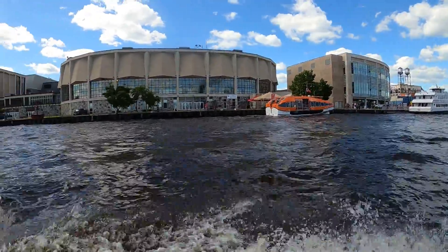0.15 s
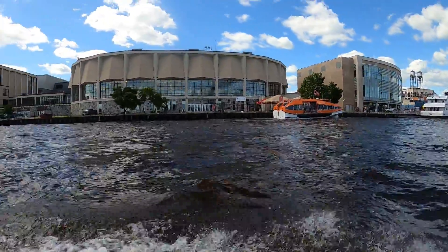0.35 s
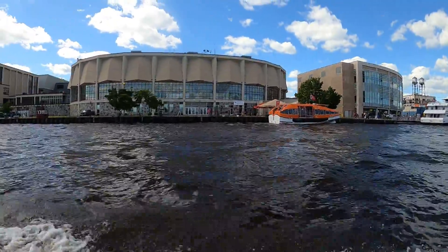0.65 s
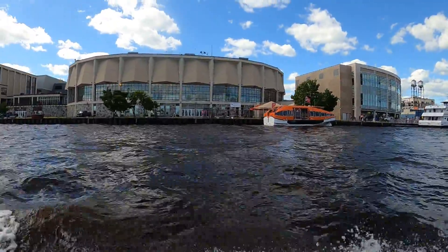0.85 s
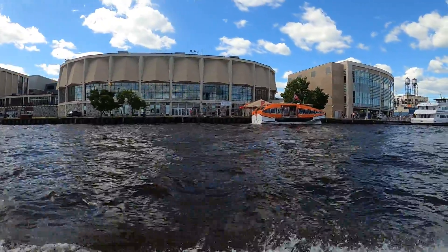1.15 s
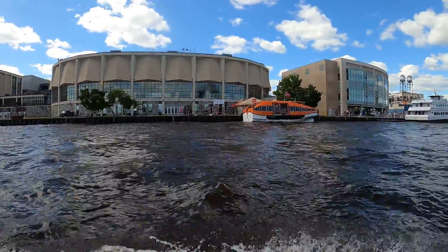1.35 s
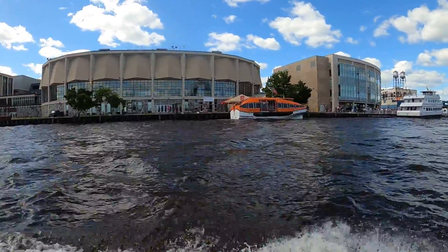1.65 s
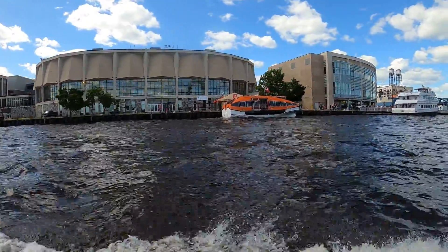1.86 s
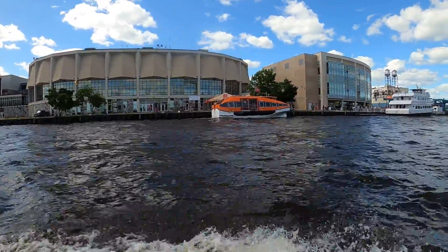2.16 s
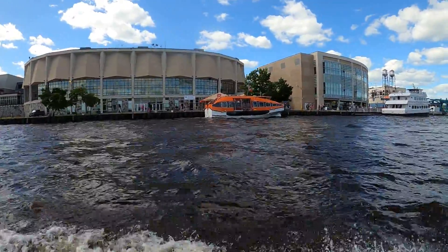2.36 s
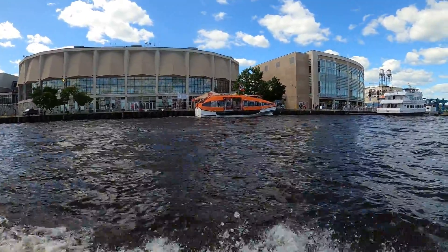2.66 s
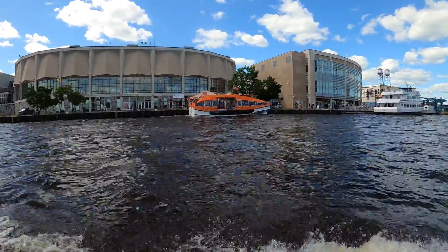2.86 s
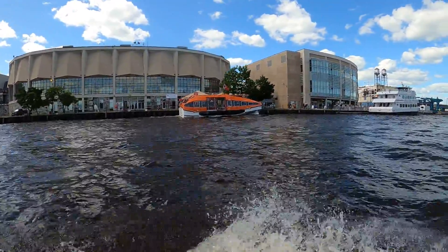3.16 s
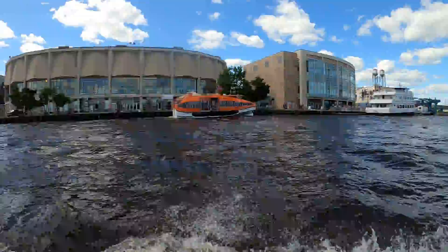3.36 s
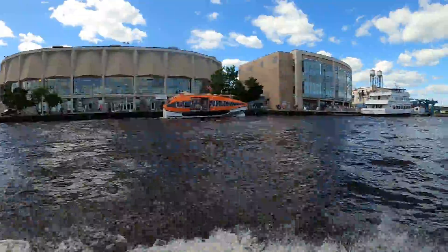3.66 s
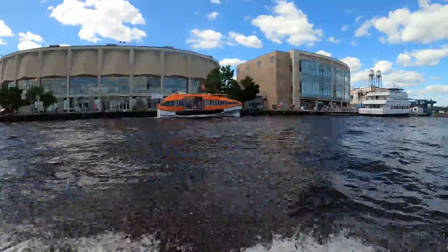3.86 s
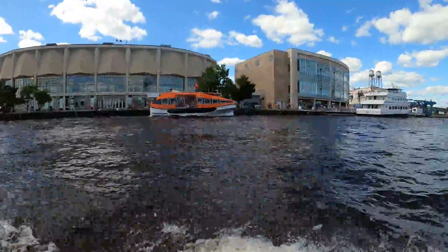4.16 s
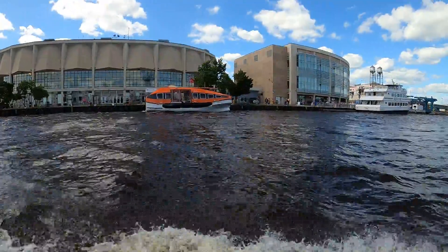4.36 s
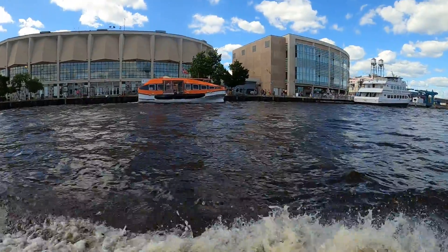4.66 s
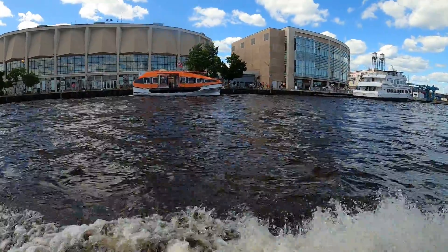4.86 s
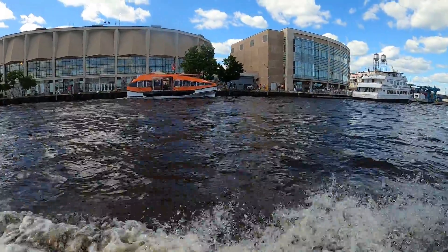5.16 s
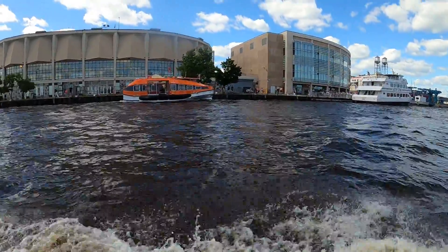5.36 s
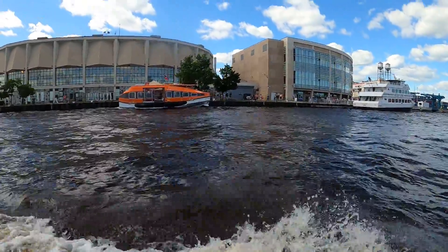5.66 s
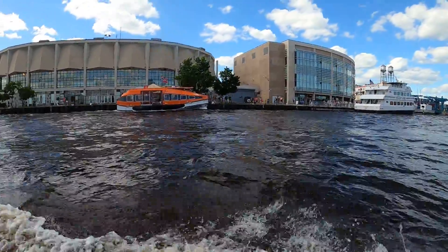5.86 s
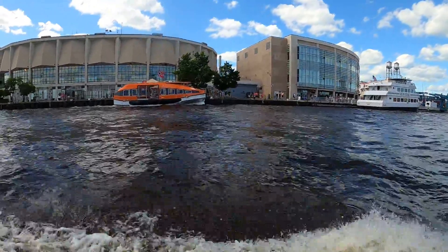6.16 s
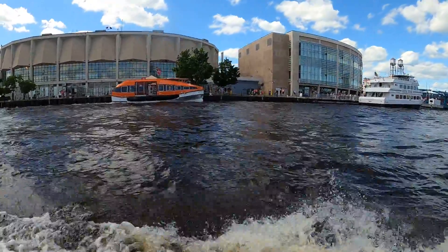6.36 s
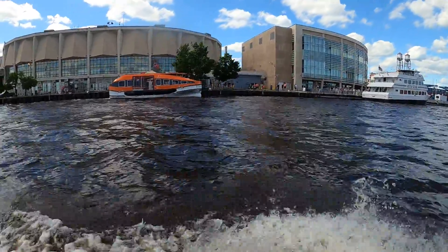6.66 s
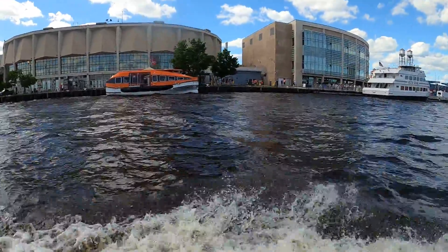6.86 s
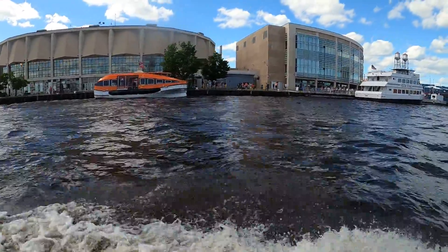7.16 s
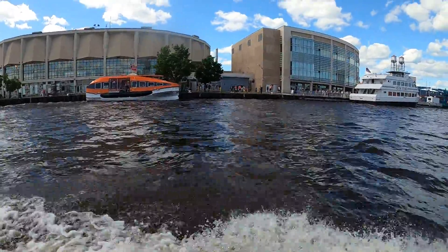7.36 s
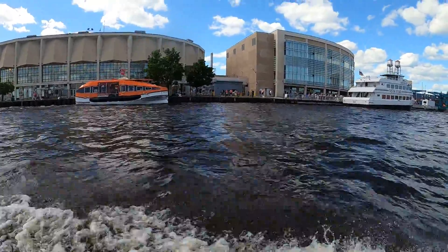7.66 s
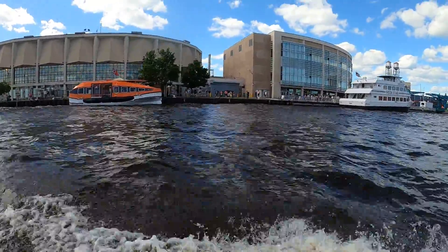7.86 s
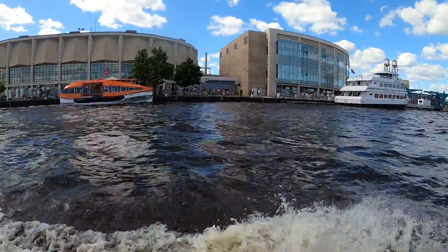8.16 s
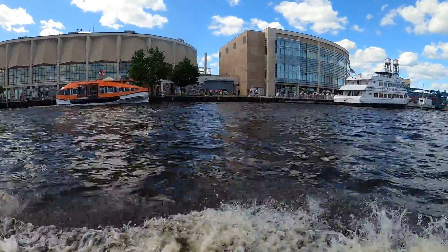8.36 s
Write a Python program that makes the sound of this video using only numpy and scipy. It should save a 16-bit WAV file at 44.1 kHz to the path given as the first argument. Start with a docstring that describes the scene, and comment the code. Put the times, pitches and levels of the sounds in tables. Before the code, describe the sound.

On board a cruising motorboat: constant deep exhaust hum, bubbling white water with surging hissing sheets of spray, rumbling wind, a single wave slap.

```python
"""A small boat cruises across a harbour, heard from on board.
From the start the exhaust drones at the firing rate, with weaker lines from shaft and unequal firings.
The wake, made of filtered noise, drops and ringing bubbles, churns and throws up sheets of spray.
Wind, a low filtered noise, buffets the microphone all along.
After about a second and a half one wave slaps the hull: a short ringing knock that falls in pitch."""
import sys
import numpy as np
from scipy import signal
from scipy.fft import rfft, irfft, next_fast_len
from scipy.io import wavfile

SR = 44100
rng = np.random.default_rng(int(sys.argv[2]) if len(sys.argv) > 2 else 0)


def master_out(mix):
    """Clip the mix to full scale and print it as 16-bit PCM to the path in sys.argv[1]."""
    frames = np.transpose(np.atleast_2d(mix))
    ceiling = np.clip(frames, -1, 1)
    pcm = np.round(ceiling * 32767).astype(np.int16)
    wavfile.write(sys.argv[1], SR, pcm)


N = 375291  # length in samples, about 8.5 s


def undb(db):
    """Turn decibels into gain."""
    return 10 ** (np.asarray(db) / 20)


def unit(x):
    """Scale to rms 1."""
    return x / np.sqrt(np.mean(x ** 2))


def curves(table):
    """Join the points of each column by straight lines in time."""
    times, *columns = np.transpose(table)
    t = np.arange(N) / SR
    return [np.interp(t, times, column) for column in columns]


def shaped(x, response):
    """Filter x by a gain that depends on frequency, then scale to rms 1."""
    size = next_fast_len(N, real=True)
    spectrum = rfft(x, size) * response(np.fft.rfftfreq(size, 1 / SR))
    return unit(irfft(spectrum, size)[:N])


def walk(rate):
    """Wander smoothly at random with rms 1, changing about rate times a second."""
    return shaped(rng.standard_normal(N), lambda f: 1 / (1 + np.square(2 * f / rate) ** 2))


def colour(x, points):
    """Filter x through a curve of (frequency [Hz], level [dB]) points."""
    hz, db = np.transpose(points)
    return shaped(x, lambda f: undb(np.interp(np.log1p(f), np.log1p(hz), db)))


def surges(table, attack_s, release_s):
    """Add up the power of events that rise, hold and fall away."""
    t = np.arange(N) / SR
    total = np.zeros(N)
    for start, hold, db in table:
        corners = start + np.cumsum([0, attack_s, hold, release_s])
        total += undb(db) ** 2 * np.interp(t, corners, [0, 1, 1, 0])
    return total


def add(out, s, sound):
    """Mix a sound in at time s."""
    i = int(s * SR)
    out[i:i + len(sound)] += sound[:N - i]


def bubble(hz, cycles, glide):
    """A pocket of air rings and glides in pitch as it dies away to a hundredth."""
    age = np.arange(int(cycles * SR / hz)) * hz / (cycles * SR)  # 0 to 1
    ringing = np.sin(2 * np.pi * cycles * age * (1 + glide * age / 2))
    return np.exp(-np.log(100) * age) * ringing


# engine speed before its small waver: (time [s], firing rate [Hz])
SPEED = [(0.0, 124.6), (0.37, 125.6), (0.53, 124.4), (1.0, 124.4), (1.22, 122.7), (1.66, 121.9),
         (2.4, 121.5), (2.79, 122.3), (3.55, 120.4), (4.28, 121.1), (4.87, 122.9), (5.06, 124.7),
         (5.46, 125.5), (6.14, 125.0), (6.62, 123.3), (7.68, 121.7), (8.0, 119.9), (8.51, 120.5)]
# strength of the exhaust drone before its small waver: (time [s], level [dB])
DRONE = [(0.0, -13), (0.55, -12.3), (0.72, -14.4), (1.1, -12.5), (2.26, -12), (2.43, -13.5), (3.1, -11.5),
         (3.41, -13.8), (3.64, -12.5), (4.9, -12), (5.18, -13.5), (5.34, -12.5), (6.09, -14.5), (6.45, -12),
         (6.72, -12), (6.88, -13.8), (7.26, -12), (8.51, -12.5)]
# moments when the exhaust note hardens and its octave swells:
# (start time [s], hold [s], octave level added as power, before flutter [dB])
SWELLS = [(.21, .42, -26), (2.02, 0.47, -24.5), (2.95, 0.14, -32.5), (3.53, .02, -26.5), (4.18, .02, -30.5),
          (4.9, .04, -26.5), (5.48, .38, -22.5), (6.1, .04, -26.5), (7.28, .17, -26.5),
          (8.08, 0.084, -29.5)]
SWELL_ATTACK_S, SWELL_RELEASE_S = 0.11, 0.11
OCTAVE_DB = -34.5  # between swells, before flutter
# the drone's third harmonic before flutter: (time [s], level [dB])
THIRD = [(0.0, -39.5), (1.44, -43), (1.6, -29.5), (1.94, -36), (3.02, -40.5), (3.28, -33.5), (4.24, -33.5),
         (5.84, -41), (6.0, -48), (6.94, -36.5), (8.51, -37)]
# hum at mean speed and time 0, its growth per Hz of slowing, and its rise per second
HUM_DB, HUM_DB_PER_HZ, HUM_DB_PER_S = -43, .5, 1.11
# weaker engine lines: (multiple of the cycle rate, six firings to a cycle)
SIDE_ORDERS = [3, 4, 8, 9, 10, 14, 21]
# their levels at mean speed, before flutter: (level [dB])
SIDE_DB = [-38, -38, -39.5, -35, -51.5, -46.5, -50]


def engine(octave_flutter_db=1, rest_flutter_db=2.0, third_flutter_db=2.5, side_flutter_db=2,
           shake_db_per_hz=0.9):
    """The firing line and its overtones; the shaft and unequal firings add lines between them."""
    firing_hz, = curves(SPEED)
    drone_db, = curves(DRONE)
    third_db, = curves(THIRD)
    faster_hz = firing_hz - firing_hz.mean()

    # the load on the drive is uneven, so speed and strength waver a little
    wavering_hz = firing_hz * (1 + .0022 * walk(30))
    phase = 2 * np.pi * np.cumsum(wavering_hz) / SR
    drone = undb(drone_db + .2 * walk(45) + .12 * walk(12)) * np.sin(phase)

    resting_power = undb(OCTAVE_DB + rest_flutter_db * walk(8.8)) ** 2
    octave_gain = np.sqrt(resting_power + surges(SWELLS, SWELL_ATTACK_S, SWELL_RELEASE_S))
    octave = octave_gain * undb(octave_flutter_db * walk(13)) * np.cos(2 * phase)
    third = undb(third_db + third_flutter_db * walk(8)) * np.sin(3 * phase)

    # the hum grows as the engine slows, and creeps up with time
    hum_db = HUM_DB - HUM_DB_PER_HZ * faster_hz + HUM_DB_PER_S * np.arange(N) / SR
    hum = undb(hum_db + side_flutter_db * walk(8)) * np.sin(2.5 * phase)
    out = drone + octave + third + hum

    # the engine shakes more when it runs faster
    shake_db = shake_db_per_hz * faster_hz
    for order, db in zip(SIDE_ORDERS, SIDE_DB):
        drift = 2 * np.pi * rng.random() + .25 * walk(8)  # phase in radians
        line = np.sin(order / 6 * phase + drift)
        out += undb(db + shake_db + side_flutter_db * walk(7)) * line
    return np.sqrt(2) * out  # a sine at 0 dB now has rms 1


def bubbles(low_hz=350, high_hz=3000, cycles=12, glide=0.22, spread_db=3, count=4000):
    """Air folded under by the wake rings as bubbles of many sizes, each rising in pitch."""
    out = np.zeros(N)
    for when, size, strength in rng.random((count, 3)):
        hz = low_hz * (high_hz / low_hz) ** size
        gain = undb(-spread_db * np.log(max(strength, .01)))  # many weak, a few strong
        add(out, when * N / SR, gain * bubble(hz, cycles, glide))
    return unit(out)


def drops(rate, spread_db):
    """Random impacts, about rate a second, many small and a few large."""
    hits = rng.random(N) < rate / SR
    size = np.minimum(rng.exponential(size=N), 5)
    sign = rng.choice([-1, 1], N)
    return unit(hits * sign * undb(spread_db * size))


# filter curves of the four layers of white water: (frequency [Hz], relative level [dB])
CHURN = [(90, -3.5), (160, 5.5), (280, 3), (440, -1), (560, -3), (760, -2.5), (1000, -5.5), (1400, -10.5),
         (2200, -28), (4000, -53.5)]
SPLASH = [(600, -10), (1100, 0), (1600, 3), (2100, 2), (2800, 1.5), (3700, -1), (4600, -6), (6000, -24.5),
          (9000, -41.5)]
SPRAY = [(3000, -8), (4800, 5.5), (6200, 2), (7300, 0), (8500, -4.5), (10000, -11), (12000, -20.5),
         (15500, -40)]
MIST = [(6000, -16.5), (9000, -0.5), (11200, -1.5), (12400, -1.5), (14000, -7), (15500, -16)]
# ups and downs of the churning, before its overall level and flicker: (time [s], level [dB])
CHURNING = [(0.0, -28.5), (0.6, -29), (0.76, -29.5), (2.19, -29.5), (2.36, -30.5), (3.66, -29.5),
            (5.14, -29.5), (6.34, -28), (6.8, -30), (7.02, -30.5), (7.18, -29.5), (8.51, -30.5)]
# the hull throws up a sheet of spray:
# (start time [s], hold [s], power added, relative to the steady wash [dB])
SHEETS = [(-.05, 0.28, 1.5), (.29, 0.24, -1.5), (.86, .4, -3), (1.21, 0.23, -3), (1.61, 0.33, -4),
          (2.35, .03, -6), (2.61, .13, -1), (2.98, .04, -1.5), (3.26, 0.13, -2), (3.55, 0.21, -2),
          (4.07, 0.31, -1.5), (4.46, 0.32, -1.5), (5.21, 0.09, 1.5), (5.46, 0.5, -2.5), (6.2, 0.12, 0),
          (6.45, .04, -2), (6.75, 0.12, -1), (6.89, 0.077, 0), (7.06, 0.079, -4), (7.6, 0.046, 0),
          (7.96, 0.1, -3.5), (8.32, .12, -.5)]
SHEET_ATTACK_S, SHEET_RELEASE_S = .05, .1
MIST_HANG_S = 0.12  # the finest drops take longer to come down


def wake(churn_db=1, splash_db=-37.5, spray_db=-49, mist_db=-64.5, bubble_db=-7, drop_db=-3,
         flicker_db=0.38, churn_share=0.32, spray_share=1.18, mist_share=1.1):
    """White water: low churning with bubbles, splashing sheets, a patter of spray and its finest mist."""
    def wash(rate, spread_db, points):
        """Steady hiss and a patter of drops through one filter curve."""
        patter = undb(drop_db) * drops(rate, spread_db)
        return colour(rng.standard_normal(N) + patter, points)

    churning_db, = curves(CHURNING)
    churn = colour(rng.standard_normal(N), CHURN) + undb(bubble_db) * colour(bubbles(), CHURN)
    splash = wash(4000, 2.6, SPLASH)
    spray = wash(5000, 1.7, SPRAY)
    mist = wash(5000, 2.5, MIST)

    # a sheet lifts every layer, the churning least, so a strong one sounds brighter
    sheet_db = 10 * np.log10(1 + surges(SHEETS, SHEET_ATTACK_S, SHEET_RELEASE_S))
    hanging_db = 10 * np.log10(1 + surges(SHEETS, SHEET_ATTACK_S, MIST_HANG_S))
    tumble_db = 0.62 * walk(25)  # sheets of water land unevenly
    tearing_db = .7 * walk(12)  # the mist flickers on its own as well

    churn_level_db = churn_db + churning_db + churn_share * sheet_db + flicker_db * walk(11)
    return (unit(churn) * undb(churn_level_db)
            + splash * undb(splash_db + sheet_db + tumble_db)
            + spray * undb(spray_db + spray_share * sheet_db + tumble_db)
            + mist * undb(mist_db + mist_share * hanging_db + tearing_db + tumble_db))


# filter curve of the wind: (frequency [Hz], relative level [dB])
WIND = [(12, -17.5), (25, -11), (42, -4.5), (65, -1), (100, 5), (160, 2.5), (300, -19.5), (600, -52.5),
        (3000, -91)]
# gusts on the microphone, before overall level and buffeting: (time [s], level [dB])
GUSTS = [(0, -39), (1.15, -40.5), (2.2, -45), (2.9, -47), (3.3, -38), (4.7, -49), (5.1, -40), (6.05, -42.5),
         (6.8, -35), (7.35, -47), (8.51, -46)]


def wind(wind_db=8.5):
    """Eddies rumble on the microphone, as low noise that swells with the gusts."""
    gust_db, = curves(GUSTS)
    buffet_db = 1.8 * walk(10)
    return colour(rng.standard_normal(N), WIND) * undb(gust_db + wind_db + buffet_db)


# waves slapping the hull: (time [s], level before dying away [dB], starting pitch [Hz])
SLAPS = [(1.611, -10, 640)]


def slaps(cycles=6, glide=-0.3):
    """A wave meets the hull with a short knock that falls in pitch."""
    out = np.zeros(N)
    for s, db, hz in SLAPS:
        add(out, s, undb(db) * bubble(hz, cycles, glide))
    return out


def scene():
    """Everything is close by, over open water, so the sounds add up without echo."""
    return (engine() + wake() + wind() + slaps())[None]


TOP_HZ = 15300  # the treble stops here
EDGE_S = .006  # fade at each end


def record(dry):
    """Ease the sound in and out over a few milliseconds and cut the top with a steep filter."""
    t = np.arange(N) / SR
    eased = dry * np.minimum(np.minimum(t, t[::-1]) / EDGE_S, 1)
    low_pass = signal.ellip(12, .2, 90, TOP_HZ, fs=SR, output="sos")
    return signal.sosfilt(low_pass, eased)


dry = scene()
out = record(dry)
master_out(out)
```